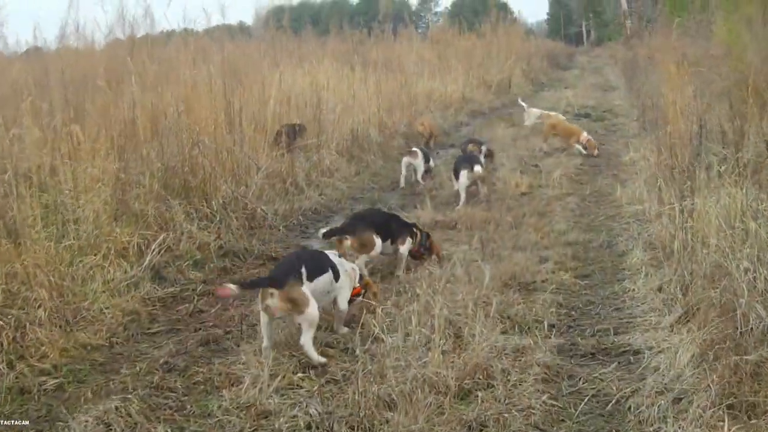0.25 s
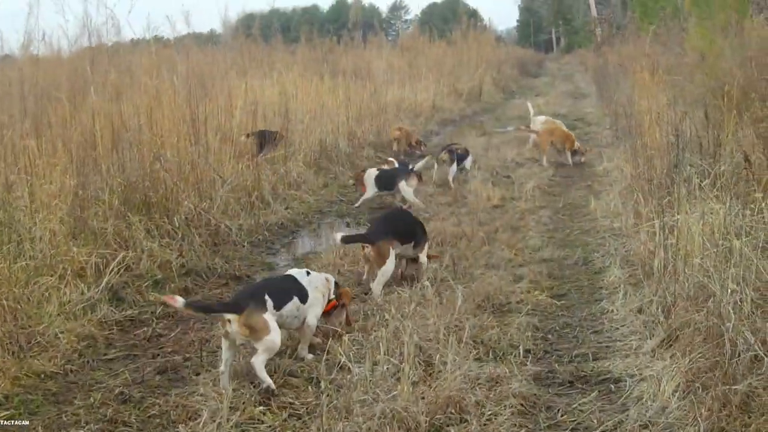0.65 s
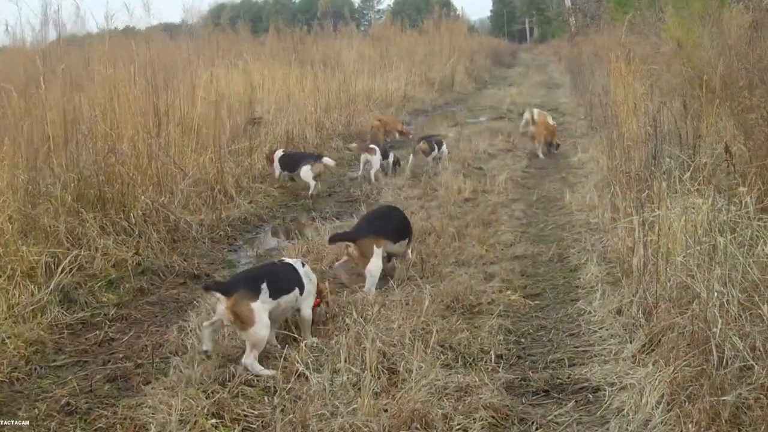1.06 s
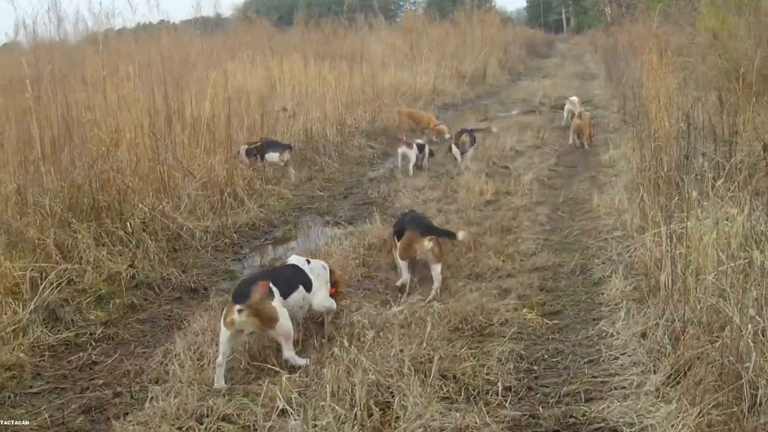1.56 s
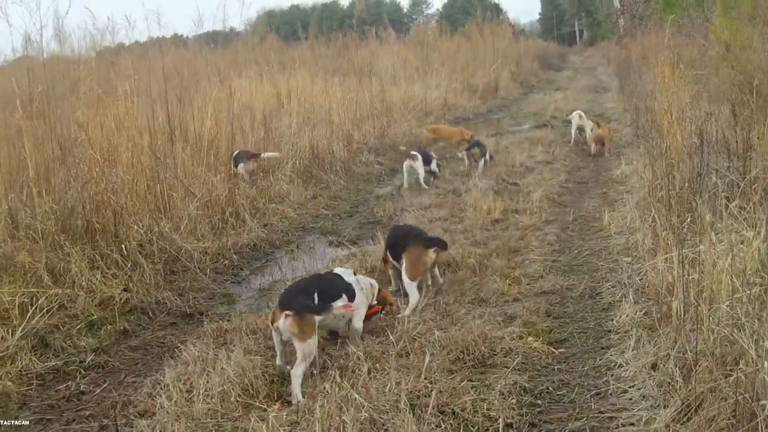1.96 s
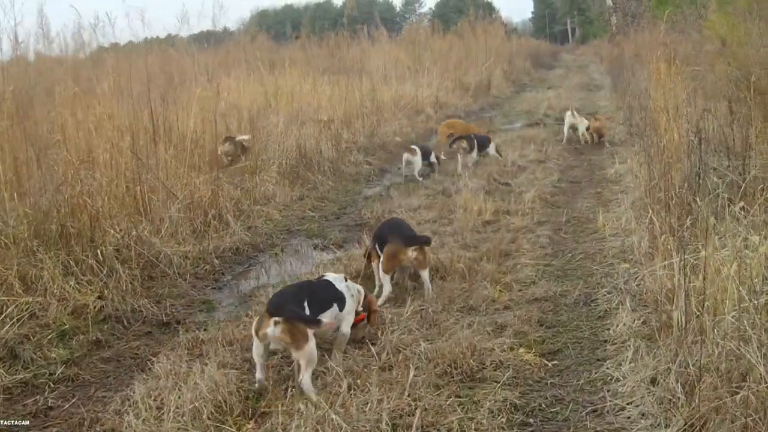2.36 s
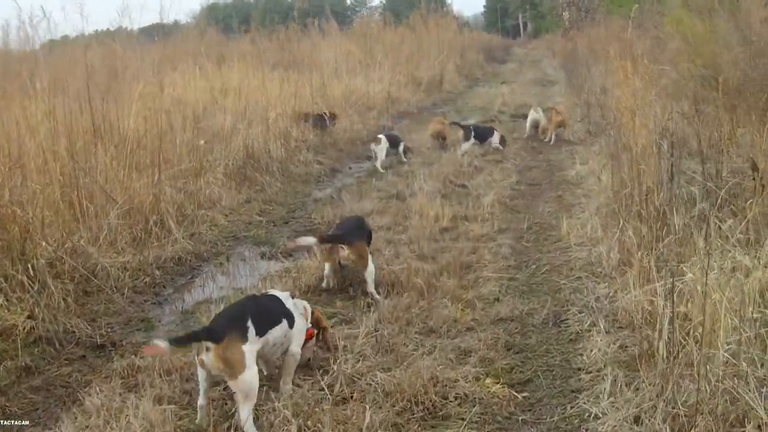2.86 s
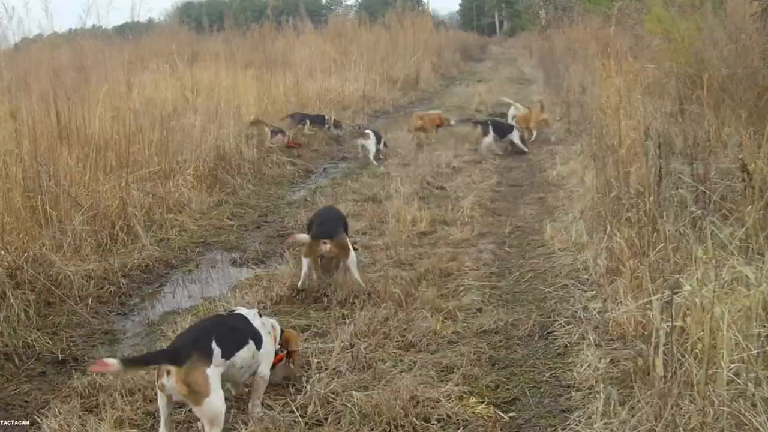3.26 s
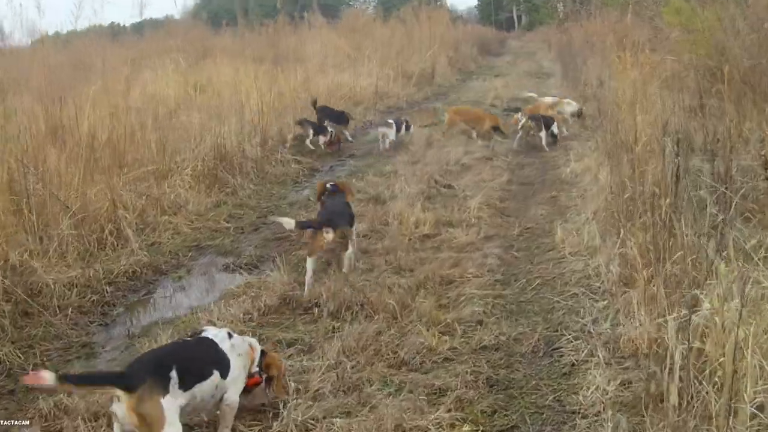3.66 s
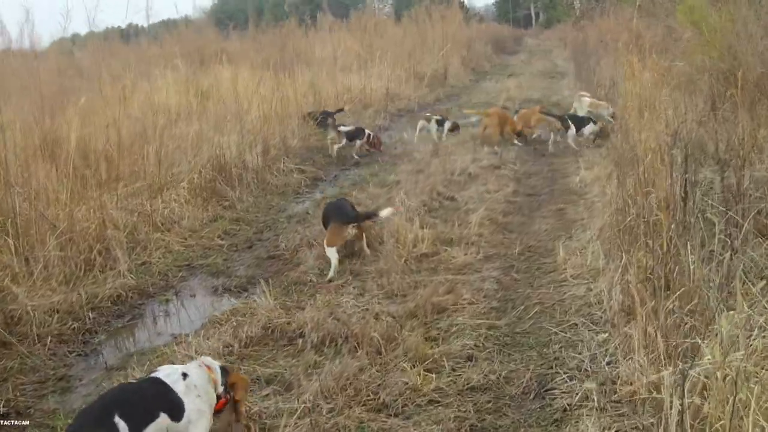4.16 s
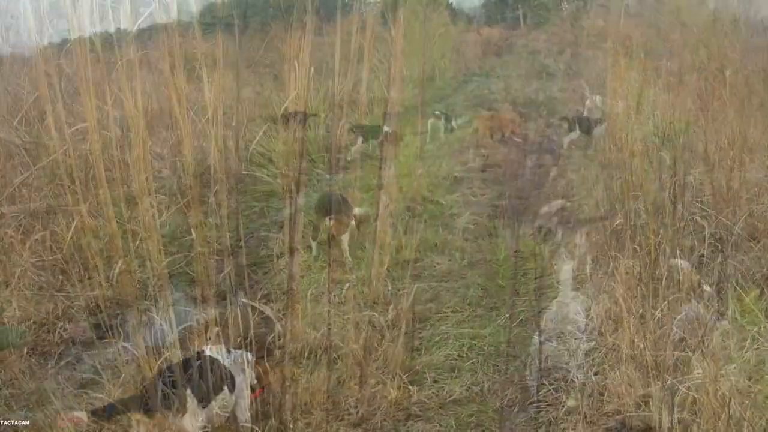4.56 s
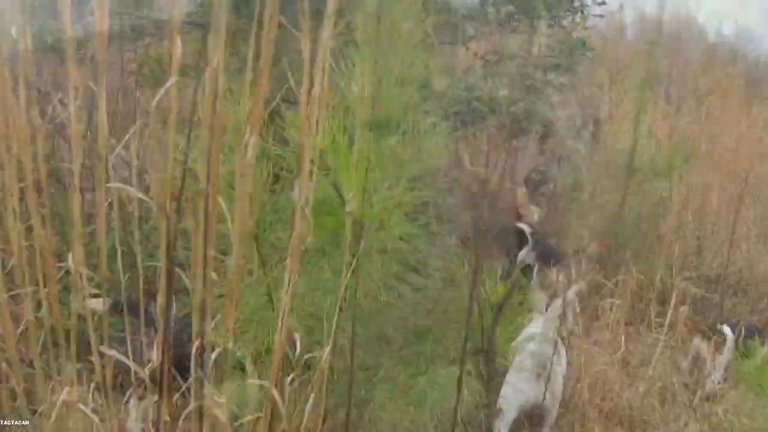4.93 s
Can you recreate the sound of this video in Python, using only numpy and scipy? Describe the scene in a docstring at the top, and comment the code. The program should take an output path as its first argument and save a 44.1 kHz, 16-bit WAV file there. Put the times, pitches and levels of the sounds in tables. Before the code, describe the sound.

A faint stalk snap opens over low wind and sparse grass crackle. From 0.1 to 0.35 s a hound gives a short howl that rises and drops; a second hound takes over with a louder, held bay until 0.85, flicking upward at the end. After a brief gap, another howl falls quickly from a high start at 1.1, with a bay answering from 1.4 to 1.65. From 1.7 to 3.2 it is quiet: soft snuffs, dull footfalls, tiny thin whimpers near 1.9, 2.4 and 2.7, low grunts, small snaps. At 3.3 the loudest bay bursts out, gritty with microphone overload, followed by a rough howl at 3.6 and a last bay at 3.9 sinking away by 4.3. Trees return a faint echo. A faint bird chip falls at 4.36. Then footfalls, a short rising whimper at 4.73, a sharp snap at 4.77, grass brushing, a low grunt, and crisp cracks after 5.1.

```python
"""A stalk snaps, then two hounds howl and bay by turns: partials of the vocal folds beating with a throat ring,
roughened by noise where the folds lose step. Snuffs, footfalls, gliding whimpers and pulsed grunts follow.
A second round of bays ends in one faint bird chip, then grass brushes and snaps close by.
Throughout, wind and stirring stalks (filtered noise) sink under loud bays, a far tree line answers faintly,
and the loudest bays overload the microphone."""
import sys
import numpy as np
from scipy import signal
from scipy.io import wavfile
from scipy.ndimage import uniform_filter1d, minimum_filter1d

SR = 44100
rng = np.random.default_rng(int(sys.argv[2]) if len(sys.argv) > 2 else 0)


def bounce(signal):
    """Save signal as a 16-bit WAV file at the path given by the first command-line argument."""
    frames = np.transpose(np.atleast_2d(signal))
    limited = np.clip(frames, -1, 1)
    pcm = np.round(limited * 32767).astype(np.int16)
    wavfile.write(sys.argv[1], SR, pcm)


N = 228953
T = np.arange(N) / SR

# One hound's howls, one table a breath:
# time_s, pitch_hz, partial_1_db, partial_2_db, mouth_opening_db, throat_ring_db
HOWLS = [
    [(.085, 375, -43, -31.5, 8, -47.5), (.103, 405.3, -35, -21.5, 15, -47.5),
     (.128, 475, -24.5, -18, 9, -36), (.145, 500, -21.5, -29, 3, -17), (.2, 530, -24.5, -27.5, -10.5, -12),
     (.218, 547, -15.5, -17.5, -1.5, -43.5), (.27, 540, -17, -16.5, -1.5, -64),
     (.31, 472, -31.5, -26, 6, -44), (.345, 334, -42.5, -24.5, 1.5, -30)],
    [(1.105, 745.4, -60, -17.5, 2, -47.5), (1.148, 622.3, -29.5, -7, -2.5, -44.5),
     (1.172, 580.5, -31, -10, 4.5, -46.5), (1.195, 542, -11.5, -6.5, -11.5, -10.5),
     (1.235, 529.7, -32, -10, -8.5, -16), (1.272, 530, -19, -5, -5.5, -61), (1.33, 585, -27, -13.5, 8, -75),
     (1.365, 603, -55.5, -17, -6, -74), (1.405, 651, -50, -8, -5, -78.5), (1.445, 630, -44.5, -20, 1, -68)],
    [(3.572, 581.4, -41, -33.5, -5.5, -13.5), (3.59, 605.5, -17, -28.5, -19.5, -18.5),
     (3.645, 610, -12, -33.5, -13.5, -33.5), (3.672, 563.7, -23.5, -32, -1, -27),
     (3.71, 498.7, -40, -22, 2, -30), (3.745, 496.5, -34, -19.5, 2.5, -50.5),
     (3.765, 483.6, -47.5, -29, 15, -70.5), (3.795, 498, -45, -26.5, 11, -82.5),
     (3.82, 526.4, -44.5, -19, 6, -77.5), (3.875, 539, -53.5, -18, 6.5, -84.5),
     (3.91, 584, -39.5, -25, 2.5, -78)],
]
# The other hound's bays, one table a breath:
# time_s, pitch_hz, partial_1_db, partial_2_db, mouth_opening_db, throat_ring_db
BAYS = [
    [(.368, 535, -19, -34.5, -0.5, -15.5), (.4, 564, -11.5, -25, 4.5, -23.5),
     (.435, 600.5, 1, -18.5, -5, -10.5), (.49, 614.6, -6, -28.5, -3.5, -34.5),
     (.51, 585.5, -9, -27, -1, -25.5), (.57, 586.4, -11.5, -38, -0.5, -23.5),
     (.64, 579.7, -15, -29.5, -4, -24.5), (.71, 570, -16, -22.5, -9.5, -27.5),
     (.77, 559, -17, -22.5, -8, -30), (.815, 551.5, -22.5, -24.5, -8, -41),
     (.834, 638, -13, -60.5, -18, -29.5), (.87, 740, -42, -85, -24, -35)],
    [(1.405, 524.6, -25.5, -37.5, -7.5, -8.5), (1.425, 559.2, -14.5, -21.5, -8.5, -19.5),
     (1.457, 597.3, -7.5, -19, -11, -23.5), (1.49, 603.2, -2, -17.5, -1, -11),
     (1.525, 597, -1, -16.5, 0.5, -33.5), (1.565, 572.6, -8.5, -14, -8, -41),
     (1.59, 566, -11, -20, -2, -19), (1.617, 588, -11.5, -19.5, -10.5, -28),
     (1.65, 710, -54, -92, -22, -26)],
    [(3.305, 536, -18.5, -23, 4, -12), (3.329, 598.4, -9.5, -16.5, 1.5, -19),
     (3.369, 619.5, 8, -10, 3, -14.5), (3.41, 628.4, 2.5, -14.5, -0.5, -53.5),
     (3.455, 617.6, -0.5, -15, -2.5, -70.5), (3.49, 600, -7.5, -19.5, 0.5, -29.5),
     (3.555, 591.2, -13, -21, 0.5, -22.5), (3.575, 612.5, -14, -42, 3.5, -21.5)],
    [(3.895, 526.5, -24.5, -20.5, 1, -18), (3.92, 595, -10, -30.5, 6, -23.5),
     (3.94, 620.8, -1.5, -20.5, 1.5, -29), (3.975, 632.4, -3, -29, 3, -33),
     (4.038, 621, -6, -31.5, -0.5, -40), (4.108, 603.6, -14.5, -27, -4.5, -38),
     (4.175, 576.4, -26, -28, -5.5, -45.5), (4.25, 546.6, -26.5, -28, 3, -43.5),
     (4.305, 539, -34, -34.5, 5.5, -38.5), (4.322, 625, -29.5, -47.5, 3.5, -48),
     (4.34, 659, -55, -79, -11, -59)],
]
# Partials 3, 4, 5, set between the first two: share_of_partial_1 (0-1), offset_db
HOWL_VOICE = [(0.99, -9), (0.033, -23), (0.7, -39.5)]
BAY_VOICE = [(.6, -2), (0.26, -17), (0.31, -24)]
# Spells in which the vocal folds lose step: start_s, end_s, roughness (0-1)
BREAKS = [(.14, .208, 0.04), (.37, 0.449, 0.1), (1.188, 1.245, 0.22), (1.41, 1.541, 0.11),
          (3.31, 3.401, 0.24), (3.572, 3.736, 0.48), (3.895, 3.998, .2)]
# Throat resonances that colour the chaos: centre_hz, width_hz, relative_db
THROAT = [(705.6, 137, 7.5), (1025.5, 86, -1.5), (1622, 170, -7.5), (2403, 450, -14.5)]
# Mouth colour on partials 3 and up: frequency_hz, gain_db
MOUTH = [(1000, -1.5), (1500, -1), (1900, 2), (2300, 2.5), (2750, 8), (3200, 0), (4000, -5), (6000, -7)]
# Whimpers: start_s, end_s, first_pitch_hz, top_pitch_hz, last_pitch_hz, fundamental_rms_db, octave_rel_db
WHIMPERS = [(1.917, 1.957, 928, 1145, 1080, -32.5, -26), (2.427, 2.495, 1285, 1367, 1095, -35.5, -50),
            (2.712, 2.742, 1110, 1289, 1170, -36.5, -9), (4.728, 4.776, 1066, 1314, 1347, -28.5, -16.5)]
# Grunts: start_s, end_s, first_pulse_rate_hz, last_pulse_rate_hz, rms_db, chest_hz, chest_width_hz
GRUNTS = [(2.49, 2.535, 245, 125, -33, 220, 350), (2.908, 2.938, 385, 375, -41, 750, 1100),
          (4.805, 4.94, 192, 196, -39, 330, 350), (4.965, 5.0, 190, 165, -43, 200, 200),
          (1.73, 1.8, 150, 150, -45, 280, 200)]
# Snuffs and footfalls: start_s, peak_db (before the treble cut), centre_hz, length_s
SNUFFS = [(0.951, -32, 163, 0.024), (0.999, -51, 147, 0.028), (1.645, -30, 290, 0.025),
          (1.835, -33.5, 269, 0.024), (1.956, -30, 367, 0.01), (2.094, -34.5, 297, 0.015),
          (2.227, -37.5, 366, 0.022), (2.38, -41.5, 280, 0.014), (2.503, -29, 600, 0.026),
          (2.662, -38.5, 198, 0.025), (2.747, -36.5, 160, 0.022), (2.83, -43.5, 301, 0.022),
          (2.984, -38, 362, 0.017), (3.202, -49, 307, 0.016), (4.473, -23.5, 347, 0.025),
          (4.574, -40.5, 365, 0.0096), (4.598, -31, 360, 0.028), (4.617, -51, 535, 0.035),
          (4.663, -36.5, 312, 0.041), (4.765, -29.5, 170, 0.0085)]
# Snapping stalks: start_s, peak_db (before the treble cut), centre_hz
SNAPS = [(0.03, -37, 620), (1.686, -40.5, 621), (2.134, -40, 783), (3.121, -39.5, 654),
         (3.151, -30.5, 3860), (3.174, -29, 1110), (4.473, -47, 583), (4.481, -35, 660),
         (4.606, -35.5, 732), (4.62, -43.5, 743), (4.63, -53, 914), (4.651, -33, 870), (4.774, -18.5, 2750),
         (4.797, -24.5, 2750), (4.886, -36, 1000), (4.961, -39, 855), (4.979, -34, 1076),
         (5.108, -31.5, 2520), (5.12, -24.5, 3200), (5.157, -35, 2940), (5.184, -29.5, 3580)]
# Grass brushed close by: time_s, level_db (before the treble cut)
RUSTLE_LEVEL = [(4.55, -99.5), (4.622, -37), (4.722, -97), (4.73, -52), (4.782, -34), (4.826, -45),
                (5.102, -41.5), (5.122, -41), (5.13, -46.5), (5.19, -41)]
# Colour of that grass: centre_hz, width_hz, relative_db
RUSTLE_COLOUR = [(890, 1300, 39.5), (2000, 3300, 40.5), (3720, 1300, 0.5), (6960, 2500, -47.5)]
# Small bird: start_s, end_s, first_pitch_hz, last_pitch_hz, peak_db
CHIP = (4.355, 4.385, 4700, 3600, -42)
# Wind spectrum: frequency_hz, relative_density_db (per Hz)
FIELD_SPECTRUM = [(15, -28), (25, -2), (555, -18), (797, -13.5), (1090, -23), (2680, -28.5), (6130, -40.5),
                  (12000, -85), (15600, -106), (22000, -120)]
# Wind level before it sinks under the bays: time_s, level_db
FIELD_LEVEL = [(0, -42.5), (1, -47.5), (2, -47.5), (3, -45.5), (4.3, -50.5), (4.6, -53.5), (4.8, -34),
               (4.97, -43.5), (5.02, -45), (5.2, -46)]

HOWL_RING_HZ, BAY_RING_HZ = 705, 720.8
HOWL_DULL_DB, BAY_DULL_DB = 10, 7  # extra fall of each high partial
CALM_ROUGH, BREAK_EDGE_S = 0.02, 0.009
WANDER_DB = 1.6  # the overtones waver as tongue and jaw move
WHIMPER_TOP, WHIMPER_EDGE = 0.66, 0.095  # shares of the length: to the top pitch, fade at either end
GRASS_TOP_HZ = 7000  # dry stalks a little way off carry no higher
ECHO_DB, ECHO_T60_S, ECHO_RISE_S, ECHO_HZ, ECHO_WIDTH_HZ = -34, 0.34, 0.21, 1620, 2600
SINK_DB, SINK_FROM_DB, SINK_RANGE_DB, SINK_HOLD_S = -8, -32, 6, .08
CLIP_UP, CLIP_DOWN, KNEE = .9, .87, 13  # rails ahead of the output gain
STRAIN_FROM, STRAIN_SOFT = .55, .07  # the stage strains well before the rail
MIC_RING_HZ, MIC_RING_WIDTH_HZ, MIC_RING_DB = 8520, 3600, 11
KICK_SCATTER_DB, SPUTTER_DB = 7.5, -4
MIC_HZ, TOP_HZ, OUTPUT_GAIN = 11600, 15750, .96


def undb(db):
    """Decibels to amplitude."""
    return 10 ** (np.asarray(db) / 20)


def unit(x):
    """Scale to rms 1."""
    return x / np.sqrt(np.mean(np.abs(x) ** 2))


def band(x, hz, width_hz, order=2):
    """Band-pass whose edges centre on hz geometrically."""
    middle_hz = np.hypot(hz, width_hz / 2)
    edges_hz = np.clip([middle_hz - width_hz / 2, middle_hz + width_hz / 2], 5, .48 * SR)
    return signal.sosfilt(signal.butter(order, edges_hz, "band", fs=SR, output="sos"), x)


def lowpass(x, hz, order):
    """Butterworth treble cut."""
    return signal.sosfilt(signal.butter(order, hz, fs=SR, output="sos"), x)


def walk(rate_hz, size=N):
    """Random levels held 1 / rate_hz and slewed twice; spread somewhat under 1."""
    hold = max(int(SR / rate_hz), 1)
    steps = np.repeat(rng.standard_normal(size // hold + 1), hold)
    return uniform_filter1d(uniform_filter1d(steps, hold), hold)[:size]


def span(table, edge_s, slew_s=.001):
    """Sample slice, columns and soft edges of one call; muscles round off sudden changes."""
    time_s, *columns = np.transpose(table)
    at = slice(int(time_s[0] * SR), int(time_s[-1] * SR))
    t = T[at]
    slew = max(int(slew_s * SR), 1)
    curves = [uniform_filter1d(np.interp(t, time_s, c), slew, mode="nearest") for c in columns]
    edge = np.clip(np.minimum(t - time_s[0], time_s[-1] - t) / edge_s, 0, 1)
    return at, curves, edge


def fold_chaos(n):
    """Folds slap shut at irregular moments and excite the throat resonances."""
    chance = rng.random((n, 2)).T
    slaps = (chance[0] < 900 / SR) * (chance[1] - .3)  # about 900 a second
    chaos = unit(sum(undb(db) * band(slaps, hz, width_hz) for hz, width_hz, db in THROAT))
    chaos = chaos / np.sqrt(.3 + uniform_filter1d(chaos ** 2, SR // 80))  # the breath behind them stays even
    return lowpass(chaos, 2300, 6)  # the mouth radiates little above this


def voice(hz, partials_db, ring_hz, ring_db, rough, dull_db):
    """Partials of the folds, a ring on the throat resonance, their sum tones, and chaos when the folds lose step."""
    n = len(hz)
    ring_db = ring_db - 20 * np.exp(-np.arange(n) / (.012 * SR))  # the ring needs a moment to build up
    fold = np.exp(2j * np.pi * np.cumsum(hz * (1 + 0.0029 * walk(60, n))) / SR)
    ring = np.exp(2j * np.pi * np.cumsum(ring_hz + 14 * walk(30, n)) / SR)
    ring = ring * undb(3.4 * walk(35, n))
    ring = ring * (1 + 0.24 * (walk(90, n) + 1j * walk(90, n)))  # it never settles fully
    beat = ring / fold
    depth = np.minimum(undb(ring_db - partials_db[0]), .45)

    levels_db = list(partials_db)
    effort_db = np.maximum(partials_db[0], partials_db[1])
    for _ in range(6):  # each follows the one two below; soft calls are duller
        levels_db.append(levels_db[-2] - 1.5 - dull_db + 0.19 * effort_db)

    tone = 0
    for k, db in enumerate(levels_db, 1):
        if k > 2:
            db = db + np.interp(k * hz, *np.transpose(MOUTH)) + WANDER_DB * walk(32.2, n)
        wobble = (walk(260, n) + 1j * walk(260, n)) / np.sqrt(2)
        sides = 0.42 * depth ** 2 * beat ** 2
        if k > 1:
            sides = sides + depth * beat + 0.1 * depth * np.conj(beat)
        sway = np.sqrt(1 - 0.57 * rough) + 0.48 * np.sqrt(rough) * wobble + sides
        sign = (-1) ** (k // 2)  # the phase turns over past each resonance, so the peaks are pointed
        tone = tone + sign * undb(db) * fold ** k * sway
    tone = tone + undb(ring_db) * np.sqrt(1 - rough) * ring
    return np.sqrt(2) * tone.imag + 4.3 * undb(ring_db) * np.sqrt(rough) * fold_chaos(n)


def howls_and_bays():
    """Each breath drives one voice; roughness rises where the folds lose step."""
    out, rough = np.zeros(N), CALM_ROUGH
    for start_s, end_s, amount in BREAKS:
        inside = np.clip(np.minimum(T - start_s, end_s - T) / BREAK_EDGE_S + .5, 0, 1)
        rough = np.maximum(rough, amount * inside)
    for calls, blend, ring_hz, edge_s, dull_db in [(HOWLS, HOWL_VOICE, HOWL_RING_HZ, .006, HOWL_DULL_DB),
                                                   (BAYS, BAY_VOICE, BAY_RING_HZ, .004, BAY_DULL_DB)]:
        for table in calls:
            at, (hz, first_db, second_db, mouth_db, ring_db), edge = span(table, edge_s, slew_s=0.0082)
            upper_db = [share * first_db + (1 - share) * second_db + mouth_db + db for share, db in blend]
            partials_db = [first_db, second_db] + upper_db
            out[at] += edge * voice(hz, partials_db, ring_hz, ring_db, rough[at], dull_db)
    return out


def whimpers():
    """Thin gliding tones: a fundamental and its octave."""
    out = np.zeros(N)
    for start_s, end_s, first_hz, top_hz, last_hz, db, octave_db in WHIMPERS:
        length_s = end_s - start_s
        glide = [(start_s, first_hz), (start_s + WHIMPER_TOP * length_s, top_hz), (end_s, last_hz)]
        at, (hz,), edge = span(glide, WHIMPER_EDGE * length_s, slew_s=0.011)
        phase = 2 * np.pi * np.cumsum(hz) / SR
        tone = np.sin(phase) + undb(octave_db) * np.sin(2 * phase)
        out[at] += np.sqrt(2) * undb(db) * edge * tone
    return out


def grunts():
    """Unsteady fold pulses through a chest resonance."""
    out = np.zeros(N)
    for start_s, end_s, first_hz, last_hz, db, chest_hz, width_hz in GRUNTS:
        at, (hz,), edge = span([(start_s, first_hz), (end_s, last_hz)], edge_s=0.004)
        saw = np.cumsum(hz * (1 + 0.069 * walk(100, len(hz)))) / SR % 1  # slow opening, sudden closing
        out[at] += undb(db) * edge * unit(band(saw - .5, chest_hz, width_hz))
    return out


def snuffs():
    """Snuffs and footfalls: short puffs of low noise."""
    out = np.zeros(N + SR)
    t = np.arange(int(.12 * SR)) / SR
    for start_s, db, hz, length_s in SNUFFS:
        swell = t / length_s * np.exp(-(t / length_s) ** 2)
        puff = band(rng.standard_normal(len(t)), hz, 0.87 * hz) * swell
        out[int(start_s * SR):][:len(t)] += undb(db) * puff / np.abs(puff).max()
    return out[:N]


def snaps():
    """Stalks snap: a noise burst rings a cycle or two, with a dry crack on top."""
    out = np.zeros(N + SR)
    t = np.arange(int(.02 * SR)) / SR
    for start_s, db, hz in SNAPS:
        body = band(rng.standard_normal(len(t)) * np.exp(-t / 0.0018), hz, 0.28 * hz)
        crack = band(rng.standard_normal(len(t)) * np.exp(-t / 0.00013), 2750, 2800, order=1)
        snap = body + min(hz / 5000, .5) * crack
        out[int(start_s * SR):][:len(t)] += undb(db) * snap / np.abs(snap).max()
    return out[:N]


def rustle():
    """Brushed grass: dense tiny crackles of very unequal size."""
    at, (db,), edge = span(RUSTLE_LEVEL, edge_s=0.0044)
    n = len(db)
    size_db = 4.6 * np.minimum(rng.exponential(size=n), 6) + 2.7 * walk(58.4, n)
    grains = rng.standard_normal(n) * undb(size_db)
    coloured = sum(undb(gain_db) * band(grains, hz, width_hz) for hz, width_hz, gain_db in RUSTLE_COLOUR)
    out = np.zeros(N)
    out[at] = edge * undb(db) * unit(coloured)
    return out


def bird():
    """One chip: a falling sine."""
    start_s, end_s, first_hz, last_hz, db = CHIP
    at, (hz,), edge = span([(start_s, first_hz), (end_s, last_hz)], edge_s=0.015)
    out = np.zeros(N)
    out[at] = undb(db) * edge * np.sin(2 * np.pi * np.cumsum(hz) / SR)
    return out


def tree_echo(dogs):
    """A far tree line scatters the calls: convolution with a swelling, decaying noise tail."""
    t = np.arange(SR) / SR
    tail = unit(band(rng.standard_normal(SR), ECHO_HZ, ECHO_WIDTH_HZ, order=1))
    tail = tail * 1000. ** (-t / ECHO_T60_S) * np.clip(t / ECHO_RISE_S, 0, 1)
    tail = tail / np.sqrt(np.sum(tail ** 2))
    return undb(ECHO_DB) * signal.fftconvolve(dogs, tail)[:N]


def stirring():
    """Scattered faint crackles, in uneven bunches, as the pack pushes through dry stalks."""
    chance = rng.random((N, 2)).T
    hit = chance[0] < 300 * undb(6 * walk(6)) / SR
    ticks = hit * (chance[1] - .5) * undb(3.3 * rng.standard_normal(N))
    return undb(-61.5) * unit(band(ticks, 1400, 1800, order=1) + 0.89 * band(ticks, 1700, 2400))


def field():
    """Wind and stirring grass: half-octave noise bands that swell together and flicker alone."""
    out, swell = 0, walk(1.7)
    spectrum_hz, spectrum_db = np.transpose(FIELD_SPECTRUM)
    for hz in 28 * 2 ** np.arange(0, 9, .5):
        db = np.interp(np.log(hz), np.log(spectrum_hz), spectrum_db)
        db = db + 0.93 * swell + 3.4 * walk(5.2)
        out = out + undb(db) * band(rng.standard_normal(N), hz, hz * 0.37, order=3)
    return unit(out) * undb(np.interp(T, *np.transpose(FIELD_LEVEL)))


def sink(dogs):
    """Background gain: sinks while a bay is loud and comes back just after."""
    loud_db = 10 * np.log10(uniform_filter1d(dogs ** 2, SR // 100) + 1e-12)
    dip = -np.clip((loud_db - SINK_FROM_DB) / SINK_RANGE_DB, 0, 1)
    hold = int(SINK_HOLD_S * SR)
    held = minimum_filter1d(dip, hold, origin=hold // 2 - 1)  # looks back
    return undb(-SINK_DB * uniform_filter1d(held, hold // 2))


def scene():
    """Hounds, their echo, the bird, grass and wind."""
    dogs = howls_and_bays() + whimpers() + grunts()
    background_gain = sink(dogs)
    grass = snuffs() + snaps() + rustle() + background_gain * stirring()
    grass = lowpass(grass, GRASS_TOP_HZ, 4)
    return (dogs + tree_echo(dogs) + bird() + background_gain * field() + grass)[None]


def squash(x):
    """Peaks flatten against the rails."""
    rail = np.where(x > 0, CLIP_UP, CLIP_DOWN)
    return x / (1 + (np.abs(x) / rail) ** KNEE) ** (1 / KNEE)


def record(dry):
    """Overload: the input stage rings on leaving a deep trough and sputters around it; then band limits."""
    x = dry[0]
    trough = -minimum_filter1d(x, size=31, origin=15)  # deepest of the last 31 samples
    overshoot = STRAIN_SOFT * np.logaddexp(0, (trough - CLIP_DOWN) / STRAIN_SOFT) * (trough > STRAIN_FROM)
    depth = .35 * np.tanh(overshoot / .35)
    released = np.diff((x < -STRAIN_FROM).astype(float), prepend=0) < 0
    kick_db = MIC_RING_DB + rng.standard_normal(N) + KICK_SCATTER_DB * walk(90)
    kick = released * np.tanh(4 * depth) * depth * undb(kick_db)
    sputter = depth ** 2 * (x > -CLIP_DOWN) * rng.standard_normal(N) * undb(SPUTTER_DB)
    y = squash(x + band(kick + sputter, MIC_RING_HZ, MIC_RING_WIDTH_HZ, order=1))
    y = lowpass(y, MIC_HZ, 12)
    y = signal.sosfilt(signal.butter(1, 10, "high", fs=SR, output="sos"), y)
    y = signal.sosfilt(signal.ellip(8, .2, 70, TOP_HZ, fs=SR, output="sos"), y)
    return OUTPUT_GAIN * y[None]


dry = scene()
out = record(dry)
bounce(out)
```